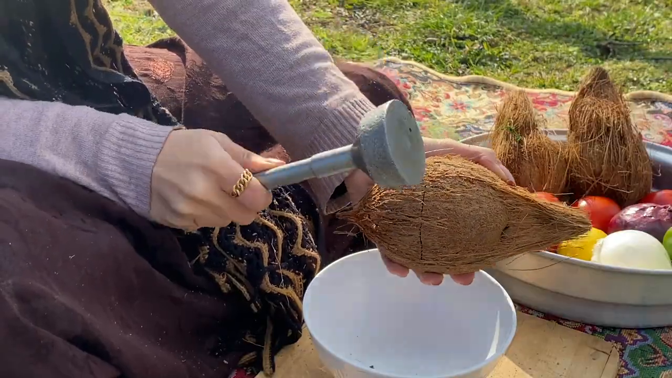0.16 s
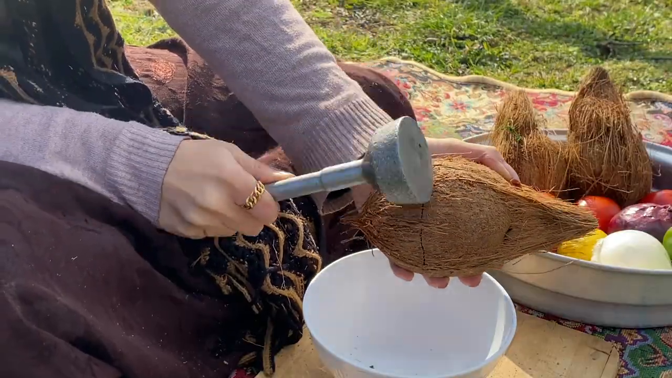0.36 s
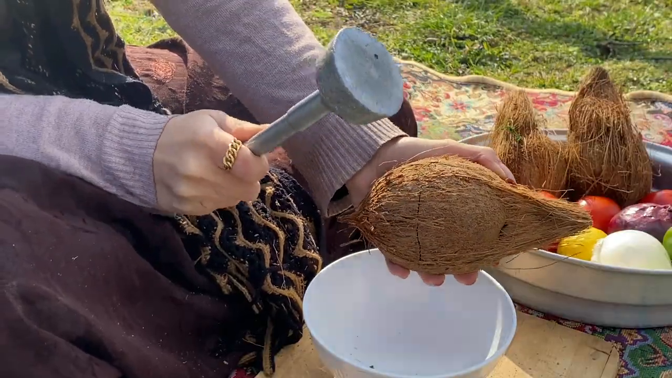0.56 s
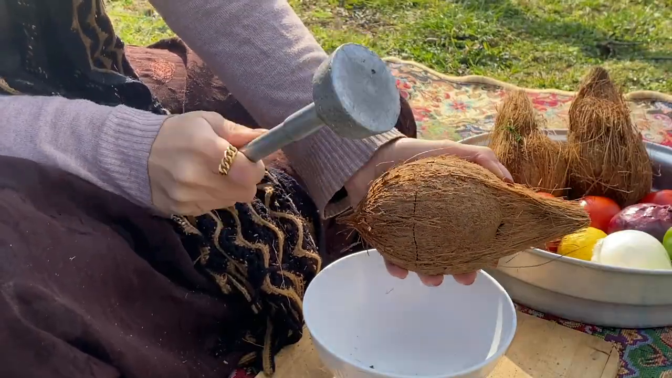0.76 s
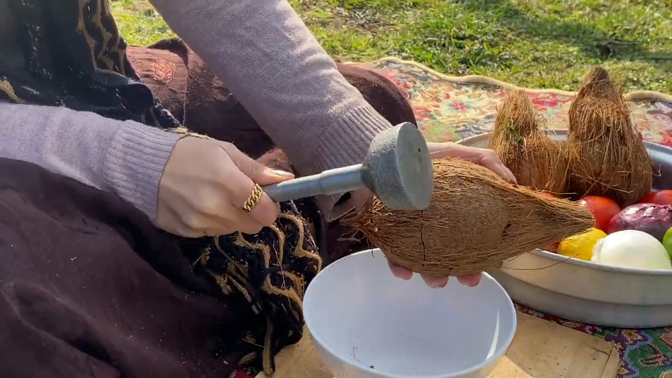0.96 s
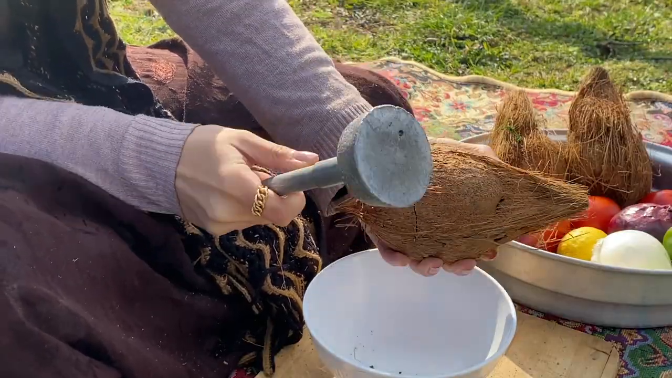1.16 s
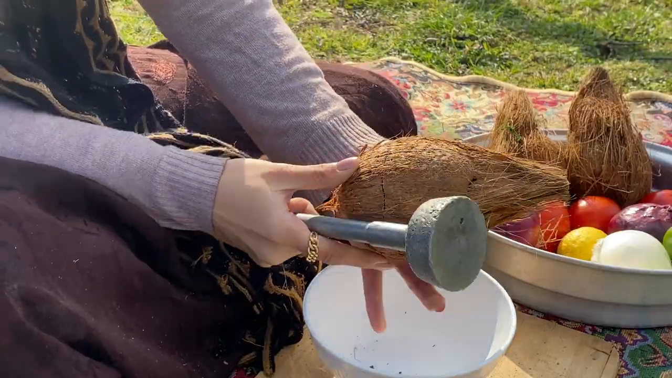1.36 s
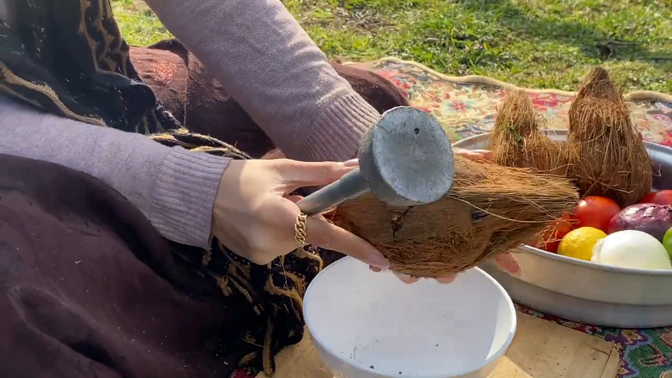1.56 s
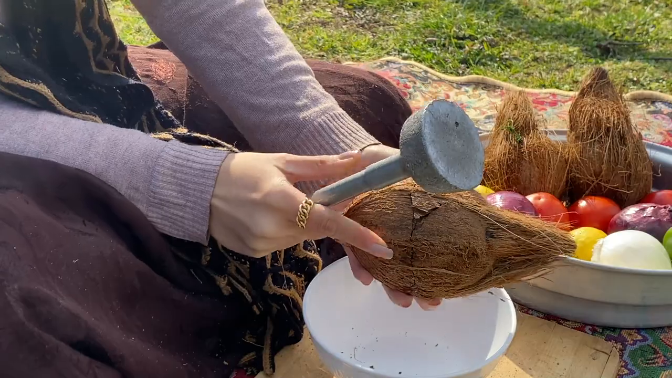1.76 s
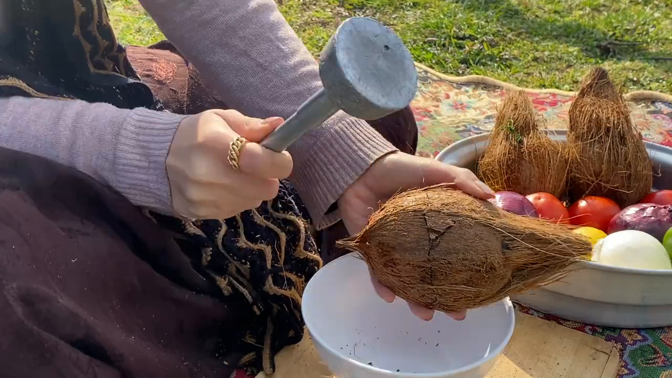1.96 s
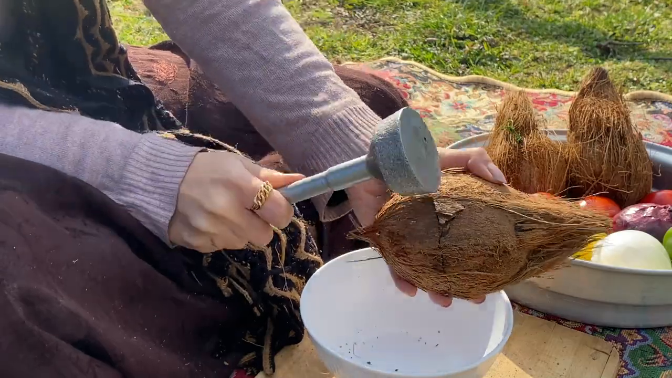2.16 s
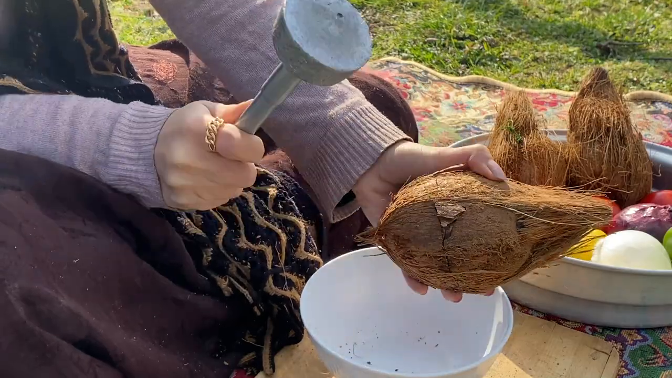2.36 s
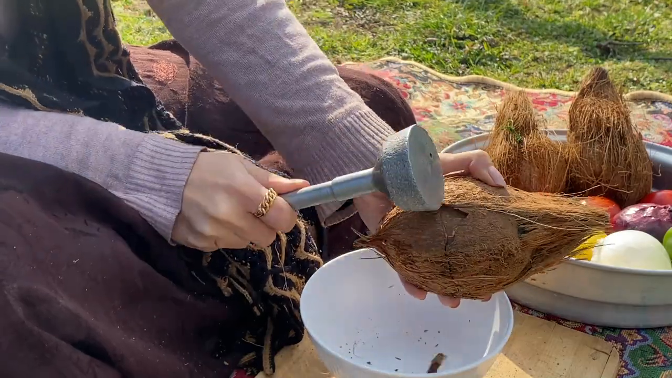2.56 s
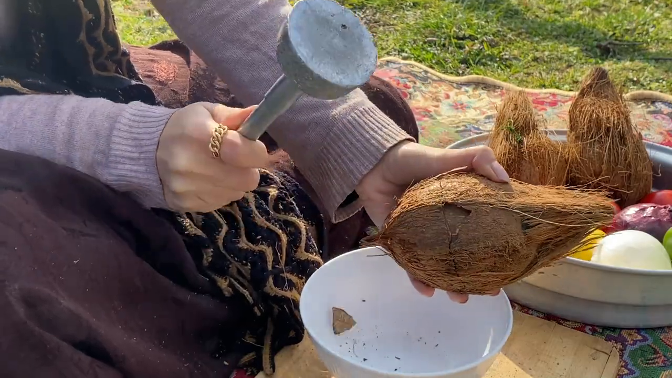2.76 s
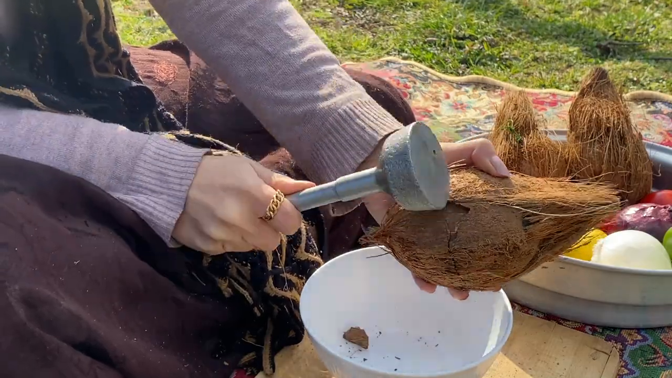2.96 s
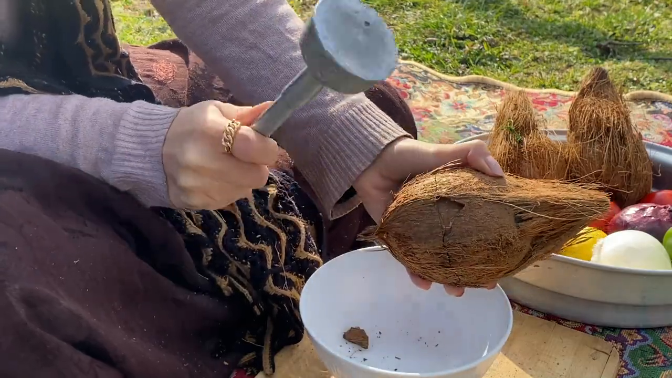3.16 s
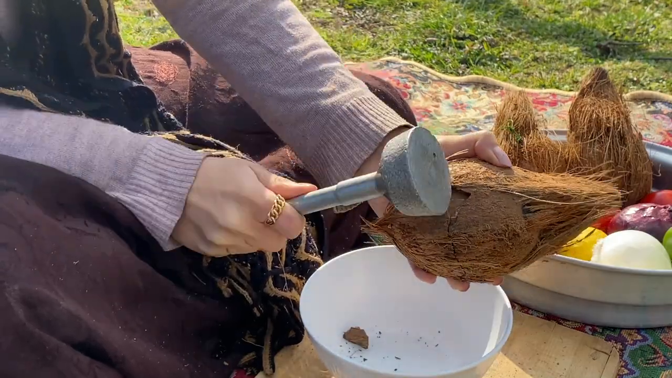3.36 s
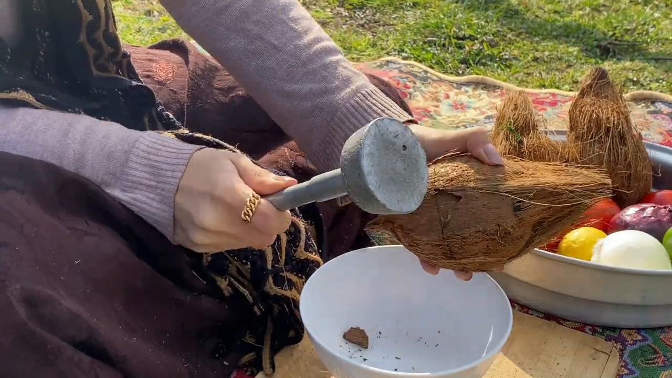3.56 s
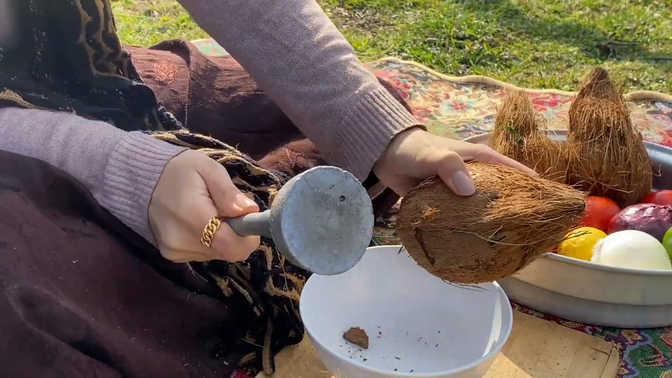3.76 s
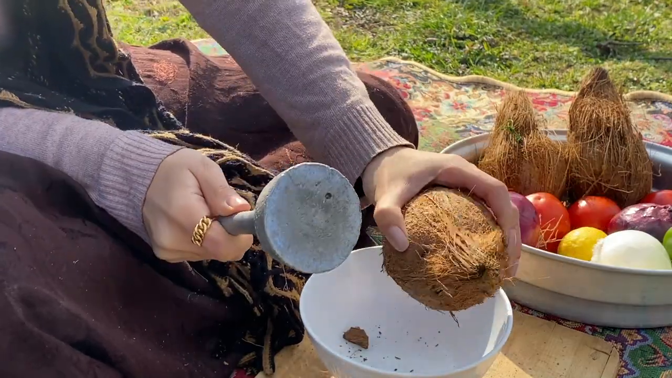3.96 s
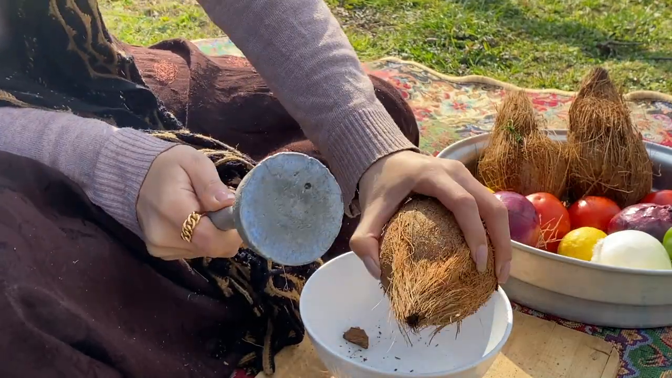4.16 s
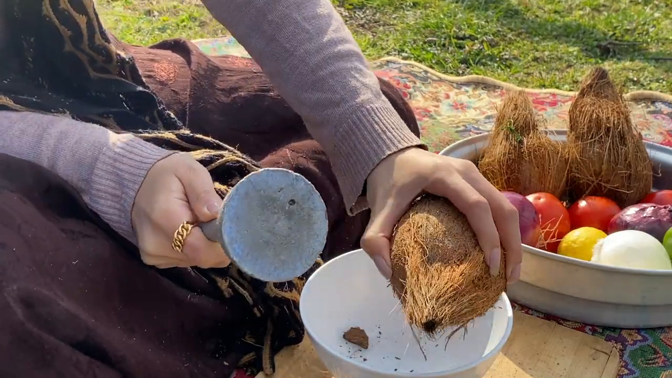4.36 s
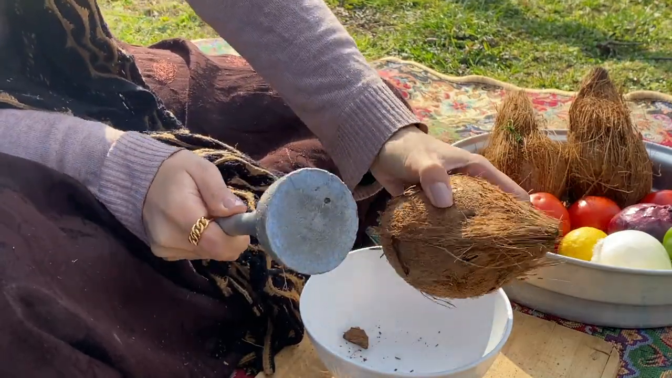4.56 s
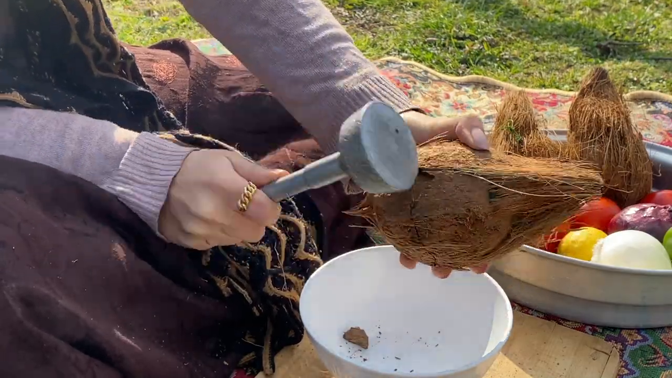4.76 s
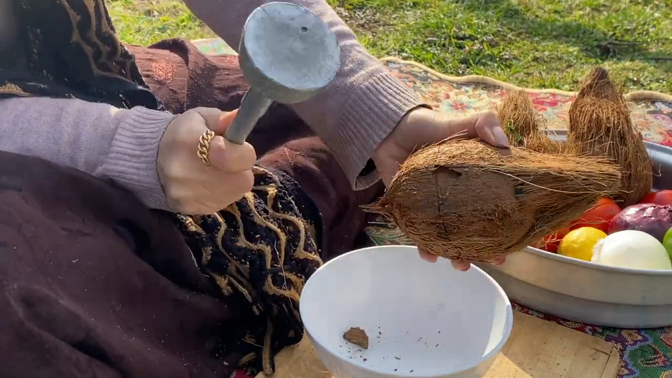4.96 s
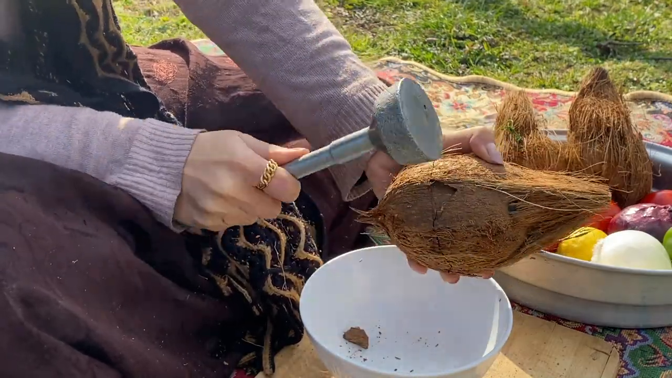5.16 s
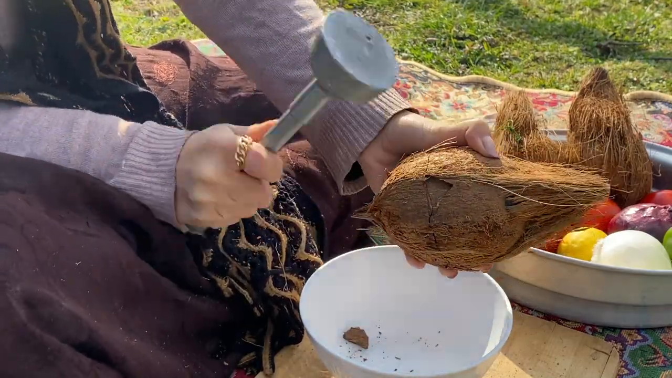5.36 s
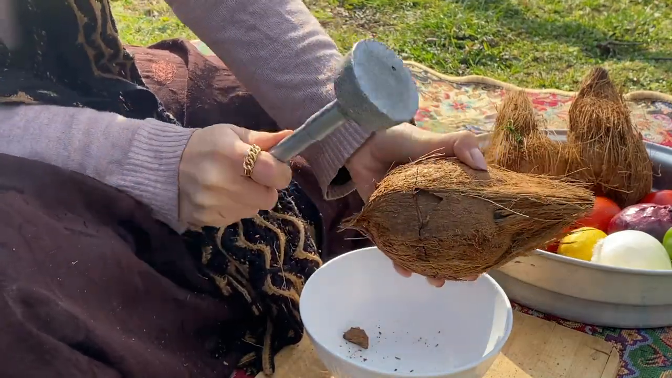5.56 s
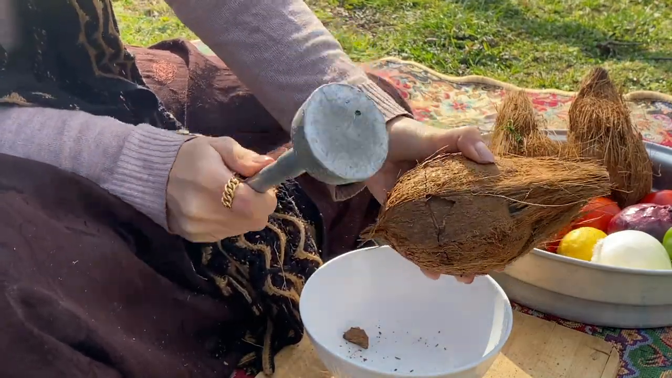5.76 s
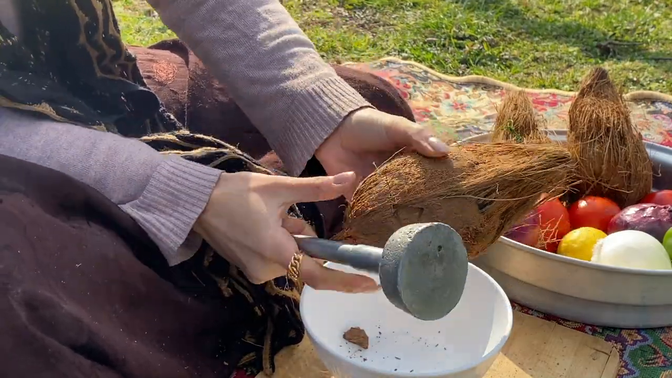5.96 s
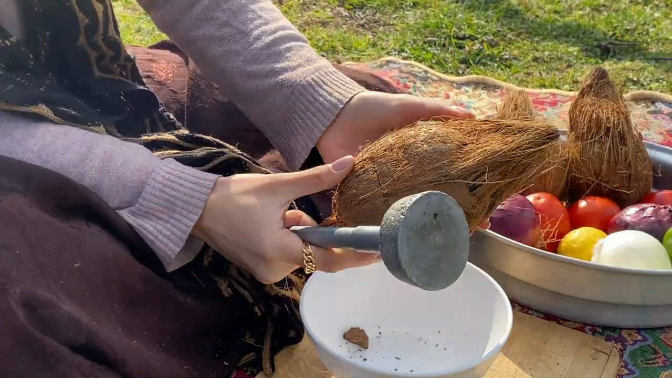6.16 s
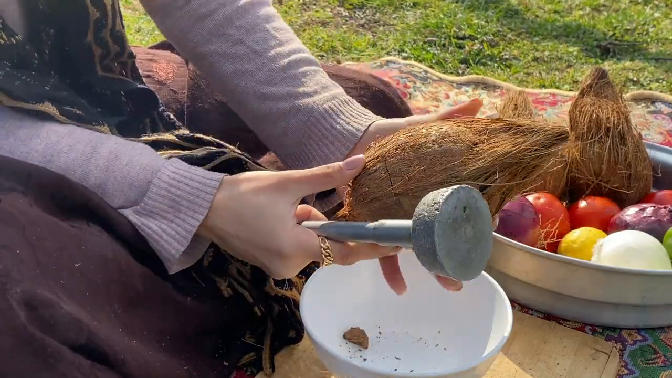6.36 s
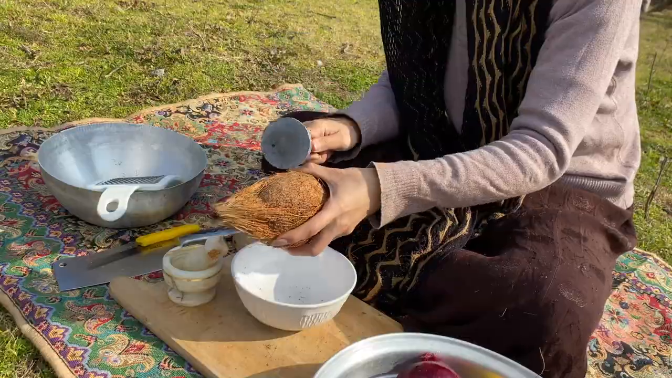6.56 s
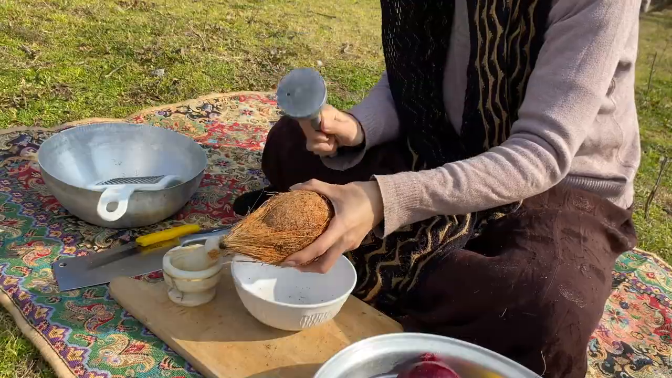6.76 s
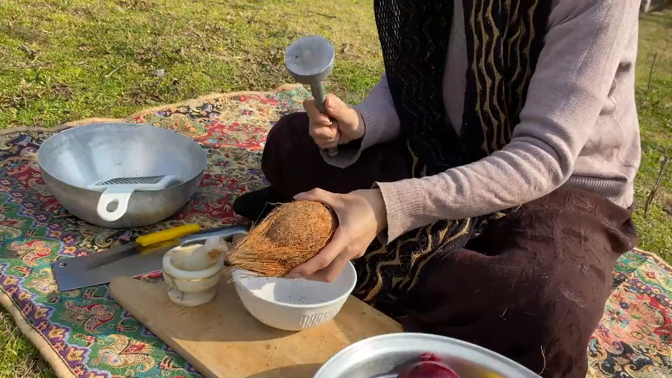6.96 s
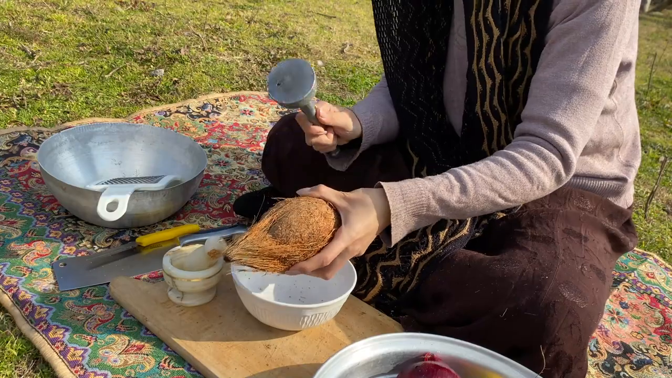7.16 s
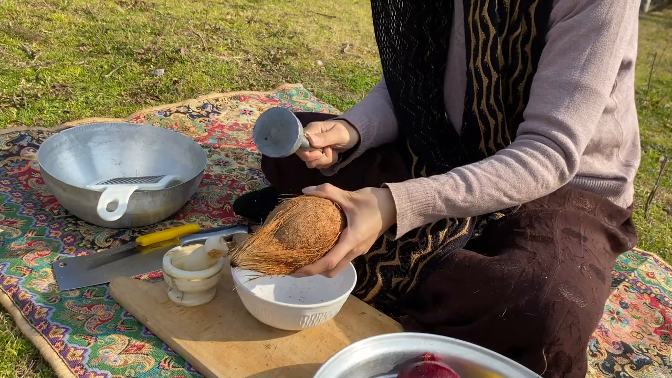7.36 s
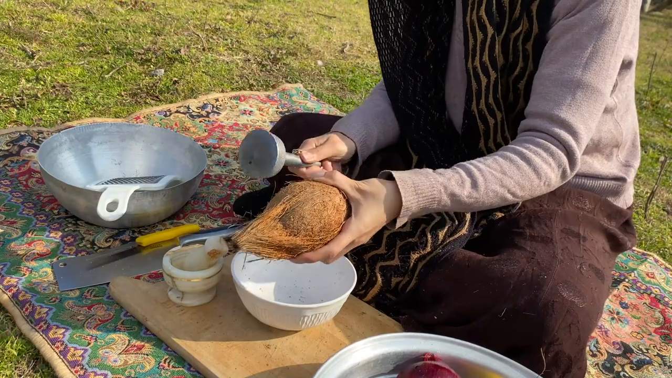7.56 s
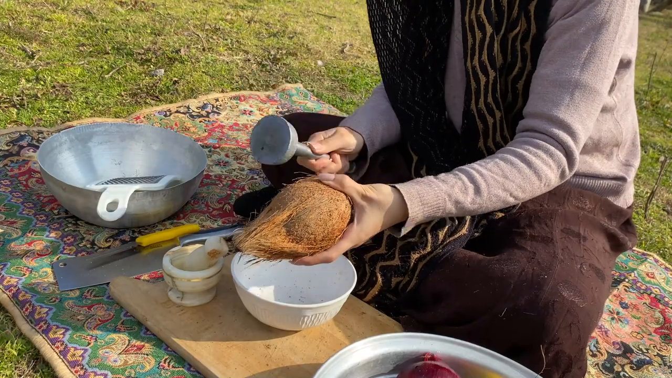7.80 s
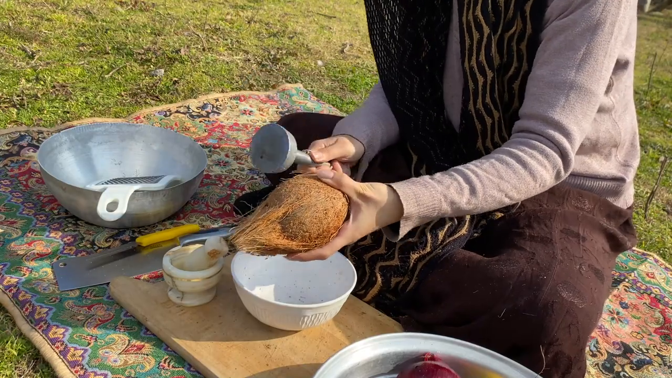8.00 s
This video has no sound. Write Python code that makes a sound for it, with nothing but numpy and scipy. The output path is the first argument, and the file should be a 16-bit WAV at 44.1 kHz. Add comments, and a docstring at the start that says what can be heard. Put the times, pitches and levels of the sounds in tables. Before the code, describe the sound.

A metal pounder strikes a hairy coconut with hard, crunchy hollow knocks outdoors, a shell chip clattering briefly in a ceramic bowl.

```python
"""On a lawn, a metal pounder beats a hairy coconut held over a ceramic bowl; a chip of shell bounces in it.
Each blow is banded crush noise with shell modes and a sagging hollow note; each bounce rings the bowl's modes.
Rough strokes of hiss are the husk rubbed in the hands; short pitched snaps are its fibres, and one low knock.
Light wind buffets the microphones as rumble, flutter and puffs, over two faint coos and open air.
Late on the listener stands elsewhere, with the nut further to the left."""
import sys
import numpy as np
from scipy import signal
from scipy.fft import rfft, irfft, next_fast_len
from scipy.io import wavfile
from scipy.ndimage import uniform_filter1d

SR = 44100
rng = np.random.default_rng(int(sys.argv[2]) if len(sys.argv) > 2 else 0)


def generate_wav(sig):
    """Save sig (samples, or channels by samples) to the path in sys.argv[1] as 16-bit PCM at SR."""
    pcm = np.round(np.clip(np.atleast_2d(sig).T, -1, 1) * 32767).astype(np.int16)
    wavfile.write(sys.argv[1], SR, pcm)


N = 354123  # samples

# Blows, the pounder's small rebounds and, at 2.01 s, a dull handling knock. Each row: start in seconds,
# level in dB, hollow note in Hz, crack note in Hz, tilt in dB an octave.
BLOWS = [(0.1103, -3, 746, 2757, -3), (0.3724, -3.5, 741, 2780, -1.5), (0.4123, -33, 776, 2090, -3),
         (0.649, -2.5, 694, 3210, 1), (0.9023, -4, 689, 2840, 0.5), (0.9347, -24.5, 733.6, 1401, -5),
         (2.0138, -28.5, 600, 1235, -73.5), (2.1846, -4, 334, 4310, 5.5), (2.5177, -4, 755, 2790, 2),
         (2.5513, -23.5, 433.3, 1240, -5.5), (2.9892, -1, 729, 2450, -1.5), (3.015, -25, 436, 1270, -4),
         (3.3931, -2.5, 721, 2465, 0.5), (3.4485, -34, 843, 1570, -2), (4.81, -3.5, 744, 1867, 1.5),
         (5.104, -3, 745, 2384, -1.5), (5.1417, -26, 396, 1238, -4.5), (5.4297, -3, 736.5, 2788, 1),
         (5.468, -20, 684, 1829, -3), (6.5985, -4.5, 383, 2513, 0), (6.8364, -4, 390, 1520, -1),
         (7.0761, -3, 376, 1570, -6), (7.3221, -3, 509, 3200, 1), (7.5657, -3.5, 513, 2163, -6),
         (7.7978, -6.5, 524, 2100, -3), (8.0237, -4.5, 536, 1580, -1)]
# The nut as heard before and after the move. Each row, for a 0 dB blow: hollow level in dB,
# after-rustle level in dB, crackle level in dB, crush length in ms, left over right in dB.
PLACES = [(-18, -70.5, -25.5, 3.3, 1.17), (-13.5, -66, -29.5, 3.11, 3.5)]
MOVE_S = 6.42  # the listener changes place


def blows():
    """The pounder strikes and rebounds, with one dull handling knock, heard from one place, then another."""
    nut = np.zeros((2, N))
    for start, *row in BLOWS:
        add(nut, start, blow(*row, *PLACES[start > MOVE_S]))
    return nut


# How far a sideways source parts the two ports. Each row: frequency in Hz, share of the full parting.
ASIDE = [(300, 1), (1300, 0.94), (5500, 0.98), (7500, 0.037)]
# Husk springing back after a blow. Each row: frequency in Hz, level in dB.
SPRING_COLOUR = [(700, -24), (1500, -8), (2400, 1), (3300, -6), (5000, -7.5), (8000, -12), (12000, -12.5),
                 (16000, -21.5)]
HOLLOW_PER_DB, AFTER_PER_DB = -0.85, 0.82  # softer blows are more hollow and stir less husk
HOLLOW_T60_S, DAMP_PER_DB = .03, .25  # a softer touch stays on the shell and damps the hollow sooner


def blow(db, hollow_hz, crack_hz, tilt_db, hollow_db, after_db, crackle_db, crush_ms, pan_db):
    """Husk is crushed for a few ms, shaking the shell, its hollow and the hand; fibres crackle after."""
    ms = np.arange(12288) / SR * 1000
    noise, spikes = rng.standard_normal((2, len(ms)))
    crack = crushing(ms, noise, spikes, tilt_db, crackle_db, crush_ms)
    crack += .45 * shaken_shell(ms, noise, crack_hz, crush_ms)

    hollow_t60 = HOLLOW_T60_S * gain_of(DAMP_PER_DB * db)
    hollow = np.convolve(hollow_note(hollow_hz, hollow_t60, size=len(ms)), np.hanning(70))
    hollow = peaked(hollow[:len(ms)]) * np.clip(ms / 1.4, 0, 1)  # swells late
    thud = np.convolve(ring(150, 0.031, size=len(ms)), np.hanning(200))
    thud = peaked(thud[:len(ms)])

    hollow_gain = gain_of(hollow_db + HOLLOW_PER_DB * db)
    sound = gain_of(db) * (0.059 * evened(crack) + hollow_gain * (hollow - 0.1 * thud))
    # the husk springs back and the sleeve follows
    add(sound, .01, rub(0.056, 0.2, after_db + AFTER_PER_DB * db, SPRING_COLOUR))

    aside_db = pan_db * read(ASIDE, np.fft.rfftfreq(len(ms), 1 / SR))
    nearer = gain_of(aside_db / 2) * np.exp(.12j * aside_db)  # the nearer port hears it louder and sooner
    return irfft(rfft(sound) * [nearer, 1 / nearer])[:, :11800]


# Crushing noise by band, treble dying first. Each row: low edge in Hz, high edge in Hz, level in dB,
# fall in dB a ms.
CRUSH_BANDS = [(120, 660, -19.5, 1), (474, 1100, -11, 4.5), (1042, 2200, -6.5, 5.5), (2060, 4270, -5, 6.5),
               (3770, 6840, -8, 6.5), (6010, 9390, -11, 12), (10350, 13000, -12.5, 12.5),
               (12900, 13000, -21, 8.5)]
TREBLE_CUT = .85  # above 3 kHz the crush is shorter, by this power of the pitch


def crushing(ms, noise, spikes, tilt_db, crackle_db, crush_ms):
    """Husk giving way: bands of noise under the contact force, with a spiky crackle as they die."""
    crackle = gain_of(crackle_db - 0.48 * ms) * np.clip(ms / 4, 0, 1)
    crackle = crackle * gain_of(4 * evened(uniform_filter1d(spikes, size=110)))
    crack = 0
    for low, high, band_db, fall_db in CRUSH_BANDS:
        band_filter = signal.butter(2, [low, high], "band", fs=SR, output="sos")
        band = signal.sosfilt(band_filter, noise)
        band_ms = crush_ms * min(3000 / low, 1) ** TREBLE_CUT
        burst = band * crush(ms, band_ms, fall_db)
        lean_db = tilt_db * np.log2(np.clip(low, 850, 5000) / 2200)  # harder contact, brighter crack
        crack += gain_of(band_db + lean_db) * (evened(burst) + 7.5 * evened(band) * crackle)
    return crack


def crush(ms, crush_ms, fall_db):
    """Contact force: sets in within a ms, holds while the husk gives way, then lets go."""
    return np.clip(ms / 1.0, 0, 1) ** 2 * gain_of(-fall_db * np.maximum(ms - crush_ms, 0))


# The coconut shell's modes. Each row: frequency in Hz, level in dB, 60 dB decay in seconds.
SHELL = [(1300, -4.5, 0.0079), (2150, -6.5, 0.0027), (2826, -1, 0.0062), (3950, -5, 0.0046),
         (4650, -6.5, 0.0055)]


def shaken_shell(ms, noise, crack_hz, crush_ms):
    """The crushing force rattles the shell's fixed modes and this blow's own crack note."""
    modes = sum(gain_of(db) * ring(hz, t60) for hz, db, t60 in SHELL)
    modes = modes + ring(crack_hz, .007)
    force = noise * crush(ms, crush_ms - .8, 5.6)
    return evened(signal.oaconvolve(force, modes)[:len(ms)])


SAG, SAG_S = 0.4, .003  # under the blow the hollow note starts this share high and settles


def hollow_note(hz, t60, size):
    """The hollow's mode, sagging to its note as the shell relaxes."""
    t = np.arange(size) / SR
    sagging_t = t + SAG * SAG_S * (1 - np.exp(-t / SAG_S))
    return gain_of(-60 * t / t60) * np.sin(2 * np.pi * hz * sagging_t)


# The chip, and later crumbs, bouncing in the bowl. Each row: start in seconds, level in dB,
# share of the wall's low modes in dB, share near 3500 Hz in dB.
BOUNCES = [(2.607, -1.5, -41.5, -25), (2.6716, -10.5, -43, -10), (2.7072, -53, -6, -25),
           (2.7219, -43, 0.5, -14), (2.775, -22, -20.5, -22.5), (2.814, -34, -40, -36),
           (2.8345, -37, -20, -19), (2.864, -25.5, -36, -24), (2.8824, -41.5, -26, -22),
           (2.9195, -34, -27, -7.5), (2.9354, -46.5, -15.5, -8), (3.55, -44, -34, -16),
           (3.6115, -53, -42, -17), (3.6445, -56.5, -34, -12)]
# The ceramic bowl's modes. Each row: frequency in Hz, level in dB before the touch weighs it,
# 60 dB decay in seconds.
BOWL = [(251, -4.5, 0.22), (500, -0.5, 0.23), (625, 4, .06), (950, -5, 0.17), (1550, -11, .15),
        (2110, 3, 0.06), (2256, -2, 0.16), (3520, 4.5, 0.027), (3853, -12.5, 0.044), (4830, -5, .045),
        (5350, -11.5, 0.0312), (5490, -6.5, 0.02), (5640, -1.5, 0.032), (6300, -17, 0.034),
        (6190, -17, .025), (7040, -15, 0.03), (8094, -22, .025), (11016, -26.5, 0.04)]
# The chip's knock. Each row: frequency in Hz, level in dB.
KNOCK_COLOUR = [(200, -12), (600, -3), (1500, 3.5), (3000, -1), (5000, -3.5), (7500, -7), (11000, -3.5),
                (16000, -25)]
PING_DB, PING_PER_DB = -0.5, 0.69  # the ping near 2100 Hz follows the wall's share
HIGH_DB, HIGH_PER_DB = -16, -.5  # a spot strong near 3500 Hz is weak near 5200 Hz


def bounces():
    """The chip and crumbs skip in the bowl, each touch cutting short the ring before it."""
    bowl = np.zeros(N)
    flights = np.diff([start for start, *_ in BOUNCES], append=N / SR)
    all_spots = rng.standard_normal((len(BOUNCES), len(BOWL)))
    for (start, *row), free_s, spots in zip(BOUNCES, flights, all_spots):
        add(bowl, start, bounce(*row, free_s, spots))
    return bowl


def bounce(db, low_db, mid_db, free_s, spots):
    """The chip knocks the bowl at a new spot each time; only hard knocks set the long wall modes going."""
    ping_db = PING_DB + PING_PER_DB * low_db
    high_db = HIGH_DB + HIGH_PER_DB * mid_db
    share = [(500, low_db), (2100, ping_db), (3500, mid_db), (5200, high_db)]
    modes = 0
    for (hz, mode_db, t60), spot in zip(BOWL, spots):
        hardness_db = .9 * db * (t60 > .1)
        modes += gain_of(mode_db + read(share, hz) + 1.1 * spot + hardness_db) * ring(hz, t60)
    ms = np.arange(len(modes)) / SR * 1000
    contact = rng.standard_normal(len(ms)) * (gain_of(-5 * ms) + gain_of(-27 - 0.58 * ms))
    knock = peaked(coloured(contact, KNOCK_COLOUR))
    damped = gain_of(-9 * np.clip(ms - 1000 * free_s, 0, 1))  # the next touch stills much of the ring
    ringing = modes * damped * np.clip(ms / 0.65, 0, 1)
    return gain_of(db) * (ringing + gain_of(-5.5) * knock)


# Hands and sleeves rubbing the husk. Each row: start in seconds, length in seconds, level in dB,
# tilt in dB an octave.
RUSTLE = [(0.587, .075, -78, -2), (0.96, 0.4, -74, 4), (1.241, 0.48, -66, 3.5), (1.502, 0.21, -61, 3.5),
          (1.775, .08, -69, 7.5), (1.947, 0.16, -71.5, -1), (2.282, 0.23, -71.5, 7), (2.601, 0.52, -69, 4),
          (3.479, 0.25, -71.5, 6), (3.97, .25, -80.5, -.5), (4.489, .16, -74, -1), (5.503, .147, -86, 5),
          (5.74, .38, -66.5, 4.5), (6.12, 0.21, -66, 3), (6.319, 0.17, -62.5, 6)]
# Dry husk, for rubs and snaps. Each row: frequency in Hz, level in dB.
HUSK_COLOUR = [(700, -19.5), (1500, -8), (2400, 1.5), (4000, -3.5), (7000, -6), (11000, -9), (16000, -16.5)]
RISE_SHARE = 0.29  # of a stroke's length


def rustle():
    """Hands and sleeves stroke the husk, some strokes duller and some brighter."""
    hands = np.zeros(N)
    for start, length, db, tilt_db in RUSTLE:
        rise, fall = RISE_SHARE * length, (1 - RISE_SHARE) * length
        add(hands, start, rub(rise, fall, db, tilted(HUSK_COLOUR, tilt_db)))
    return hands


def rub(rise, fall, db, colour):
    """One stroke of dry fibres: hiss roughened by tiny snaps, swelling and fading."""
    size = round((rise + fall) * SR)
    noise, wobble, chance = rng.standard_normal((3, size))
    sparks = (chance > 2.8) * gain_of(12.0 * np.minimum(chance - 2.8, .6))  # rare, uneven
    snaps = signal.lfilter([1], [1, -.985], sparks)
    grain = (1 + 0.69 * snaps) * gain_of(3.5 * evened(uniform_filter1d(wobble, size=300)))
    ramp = np.interp(np.arange(size) / SR, [0, rise, rise + fall], [0, 1, 0])
    swell = np.sin(np.pi / 2 * ramp) ** 1.8
    return gain_of(db) * swell * evened(coloured(noise * grain, colour))


def tilted(points, tilt_db):
    """Leans a spectrum about 3 kHz."""
    return [(hz, db + tilt_db * np.log2(hz / 3000)) for hz, db in points]


# Single fibres and crumbs snapping, and one low knock at 2.77 s. Each row: start in seconds, level in dB,
# pitch in Hz.
TICKS = [(0.317, -49, 2000), (0.9783, -47.5, 5840), (1.1907, -57.5, 4840), (1.4162, -56.5, 3105),
         (1.4688, -50, 2840), (1.5725, -50, 2318), (2.354, -47.5, 5600), (2.3917, -50.5, 7600),
         (2.7705, -30, 680), (3.1734, -39, 2020), (3.2002, -50, 1640), (3.2404, -54.5, 4450),
         (3.6005, -55.5, 4400), (4.4344, -62.5, 1110), (4.9053, -49, 2118), (6.3869, -40, 3020),
         (6.4532, -57, 1010), (7.1304, -47, 2570), (7.74, -52, 2490)]
TICK_T60_S = 0.015


def ticks():
    """Single fibres and crumbs snap, and one low, much louder knock falls among them."""
    snaps = np.zeros(N)
    for start, *row in TICKS:
        add(snaps, start, tick(*row))
    return snaps


def tick(db, hz):
    """A short noisy snap or knock with one pitch."""
    fade = gain_of(-60 * np.arange(1500) / SR / TICK_T60_S)
    snap = peaked(coloured(rng.standard_normal(1500) * fade, HUSK_COLOUR))
    return gain_of(db) * peaked(ring(hz, TICK_T60_S, size=1500) + 0.33 * snap)


# The wind's course. Each row: time in seconds, rumble level in dB, flutter level in dB.
WIND = [(0, -68, -70), (.95, -64.5, -61.5), (1.36, -67, -62.5), (1.41, -50, -81), (1.85, -50.5, -67),
        (1.91, -43, -75), (2.06, -37.5, -67), (2.16, -59, -67), (2.5, -47, -69.5), (2.7, -59, -67),
        (3.5, -64.5, -59), (3.8, -70.5, -71), (5.0, -69, -67.5), (5.7, -61.5, -70.5), (6.1, -73, -81),
        (6.16, -53, -79), (6.42, -56.5, -85), (6.45, -42.5, -52.5), (6.8, -50, -60.5), (7.05, -48.5, -51.5),
        (7.34, -52.5, -53), (7.41, -65.5, -69), (7.51, -52.5, -52.5), (7.7, -52, -60), (7.9, -35.5, -51.5),
        (8.03, -43.5, -51)]
# Low wind rumble. Each row: frequency in Hz, level in dB.
RUMBLE_COLOUR = [(20, -29), (40, -1.5), (65, 3), (100, -4.5), (160, -22.5), (300, -67)]
# Wind flutter. Each row: frequency in Hz, level in dB.
FLUTTER_COLOUR = [(80, -28), (140, -2), (240, -3), (380, -10), (580, -28), (1000, -54)]
# Single buffets on the ports. Each row: start in seconds, level in dB before a random lean to one side,
# starting pitch in Hz.
BUFFETS = [(1.43, -33.5, 59), (1.898, -27, 67.3), (1.94, -20.5, 59.2), (2.027, -35, 81.6),
           (6.459, -31, 69.3), (6.638, -32.5, 67.3), (7.006, -35.5, 124.7), (7.11, -38.5, 83.4),
           (7.162, -36, 238), (7.219, -41.5, 182), (7.491, -40.5, 300), (7.65, -36, 114.5),
           (7.739, -36, 80.7), (7.907, -25.5, 80.7), (7.948, -33.5, 180.6)]


def wind():
    """Lumpy pressure on the ports: a low rumble, nearly common to both, a looser flutter, single buffets."""
    # likeness of the ports: (Hz, share)
    rumble = hiss(RUMBLE_COLOUR, [(30, 1.0), (150, .94)], patchy_db=2.0, size=2048)
    flutter = hiss(FLUTTER_COLOUR, [(100, 0.43), (500, 1.0)], patchy_db=5.0, size=1024)
    lumps = gain_of(2.0 * evened(uniform_filter1d(rng.standard_normal(N), size=900)))
    out = follow(WIND, axis=1) * evened(lumps * rumble)
    out += follow(WIND, axis=2) * evened(lumps * flutter)
    t = np.arange(0, .03, 1 / SR)
    for (start, db, hz), (turn, side) in zip(BUFFETS, rng.random((len(BUFFETS), 2))):
        sagging_turns = hz * t * (1 - 2.2 * t) + turn
        puff = np.sin(2 * np.pi * sagging_turns) * np.hanning(len(t))
        lean_db = 7.1 * (side - .5) * np.array([[1], [-1]])
        add(out, start, gain_of(db + lean_db) * puff)
    return out


# Faint far coos. Each row: start in seconds, length in seconds, starting pitch in Hz, level in dB.
COOS = [(0.954, 0.46, 720, -82.5), (3.897, 0.36, 718, -82.5)]


def coos():
    """Two faint coos from far off."""
    far = np.zeros(N)
    for start, *row in COOS:
        add(far, start, coo(*row))
    return far


def coo(length, hz, db):
    """A soft, slightly rising tone."""
    t = np.arange(0, length, 1 / SR)
    tone = np.sqrt(2) * np.sin(2 * np.pi * hz * (t + 0.04 * t ** 2))
    return gain_of(db) * tone * signal.windows.tukey(len(t), .6)


# Open air. Each row: frequency in Hz, level in dB.
AIR_COLOUR = [(180, -35), (300, -4), (367, -0.5), (1350, -16), (2740, -24), (7060, -26), (9100, -39),
              (11300, -30.5), (13400, -49.5), (17000, -51)]
# How alike the air is at the two ports. Each row: frequency in Hz, left-right likeness as a share.
AIR_SAME = [(300, 0.23), (700, 0.52), (1300, 0.087), (2400, 0.96), (5000, 0.44), (8000, 0.69)]
AIR_DB = -73.5


def open_air():
    """A faint, patchy two-channel hiss under everything."""
    return gain_of(AIR_DB) * hiss(AIR_COLOUR, AIR_SAME, patchy_db=3.5, size=1024)


def gain_of(db):
    """Decibels to gain."""
    return 10 ** (np.asarray(db) / 20)


def evened(x):
    """Scales to rms 1."""
    return x / np.sqrt(np.mean(x ** 2) + 1e-20)


def peaked(x):
    """Scales to peak 1."""
    return x / np.max(abs(x))


def read(points, hz):
    """Reads a table on a log-frequency axis."""
    f, value = np.transpose(points)
    return np.interp(np.log(hz + 1), np.log(f + 1), value)


def add(mix, start, sound):
    """Lays a sound into the mix at start seconds."""
    part = mix[..., round(start * SR):][..., :sound.shape[-1]]
    part += sound[..., :part.shape[-1]]


def ring(hz, t60, size=6000):
    """One dying mode, falling 60 dB in t60 seconds."""
    t = np.arange(size) / SR
    return gain_of(-60 * t / t60) * np.sin(2 * np.pi * hz * t)


def coloured(x, points):
    """Passes x through a causal (minimum-phase) filter with the given spectrum."""
    log_gain = np.log(gain_of(read(points, abs(np.fft.fftfreq(2048, 1 / SR)))))
    taps = np.fft.ifft(np.exp(np.conj(signal.hilbert(log_gain)))).real
    return signal.oaconvolve(x, taps[:512])[:len(x)]


def hiss(points, same, patchy_db, size):
    """Two-channel noise with a spectrum, random patches and a left-right likeness."""
    hop = size // 4
    hz = np.fft.rfftfreq(size, 1 / SR)
    a, b, c, d, patches = rng.standard_normal((N // hop + 5, len(hz), 5)).T
    patches = uniform_filter1d(patches, size=5, axis=0)  # across frequency
    patches = evened(uniform_filter1d(patches, size=7, axis=1))  # across time
    same = np.clip(read(same, hz), -1, 1)[:, None]
    left = a + 1j * b
    right = same * left + np.sqrt(1 - same ** 2) * (c + 1j * d)
    z = np.array([left, right]) * gain_of(read(points, hz)[:, None] + patchy_db * patches)
    return evened(signal.istft(z, nperseg=size, noverlap=size - hop)[1][:, :N])


def follow(rows, axis):
    """Gain that follows one dB column of a curve."""
    rows = np.array(rows)
    return gain_of(np.interp(np.arange(N) / SR, rows[:, 0], rows[:, axis]))


def scene():
    """Near events over rustle, wind and open air."""
    nut = blows()
    small = bounces() + ticks() + rustle() + coos()
    return nut + small + wind() + open_air()


# Phase between the two microphone ports. Each row: frequency in Hz, left port's lead in radians.
PORTS = [(0, 0), (950, -.1), (2930, .4), (5680, -.1), (6900, -.1), (7490, -.9), (8950, -3.14),
         (13250, -9.42), (15300, -12.57), (17000, -12.6)]
EDGE_HZ = 17000  # upper band limit


def record(dry):
    """The ports part in phase in the treble and lose the deepest bass; peaks are squashed; then the band limit."""
    size = next_fast_len(N + 2048)
    hz, lead = np.transpose(PORTS)
    half = np.exp(.5j * np.interp(np.fft.rfftfreq(size, 1 / SR), hz, lead))
    pair = irfft(rfft(dry, size) * [half, half.conj()], size)[:, :N]
    pair = signal.sosfilt(signal.butter(2, 50, "high", fs=SR, output="sos"), pair)
    squashed = 0.89 * np.tanh(gain_of(1.5) * pair)
    band_limit = signal.firwin(511, EDGE_HZ, window=("kaiser", 9), fs=SR)
    return signal.oaconvolve(squashed, band_limit[None], "same")


dry = scene()
out = record(dry)
generate_wav(out)
```